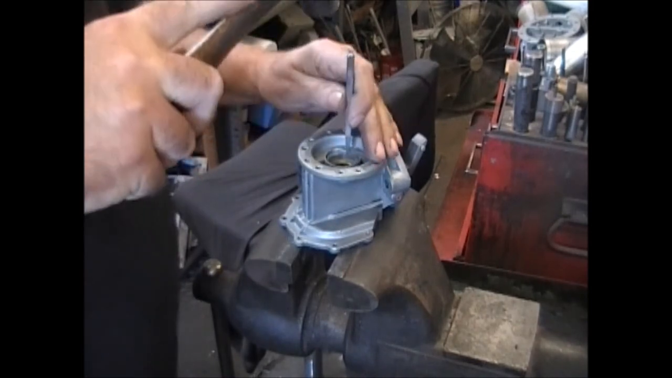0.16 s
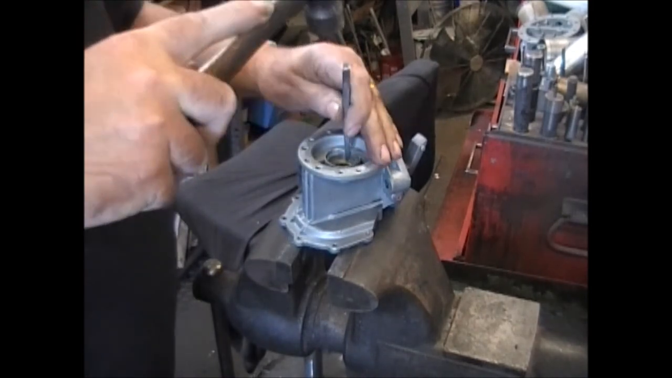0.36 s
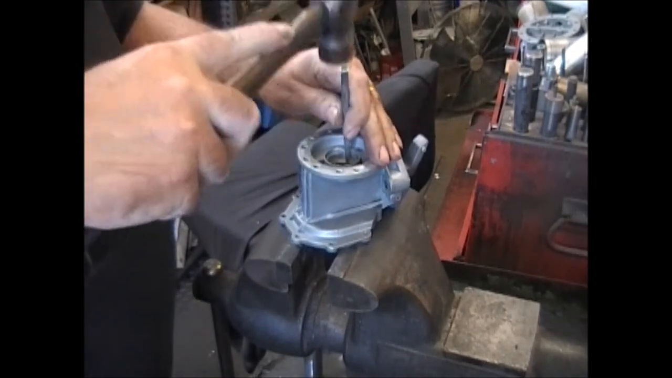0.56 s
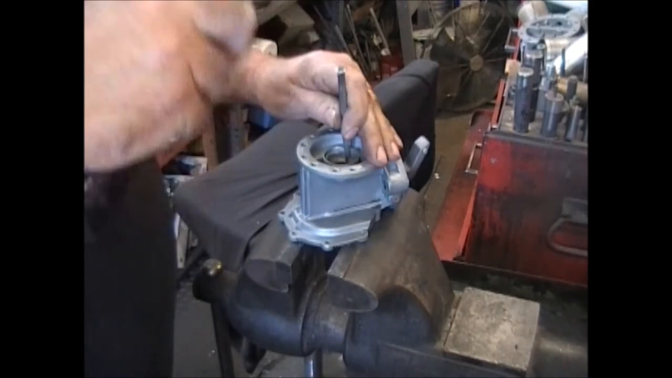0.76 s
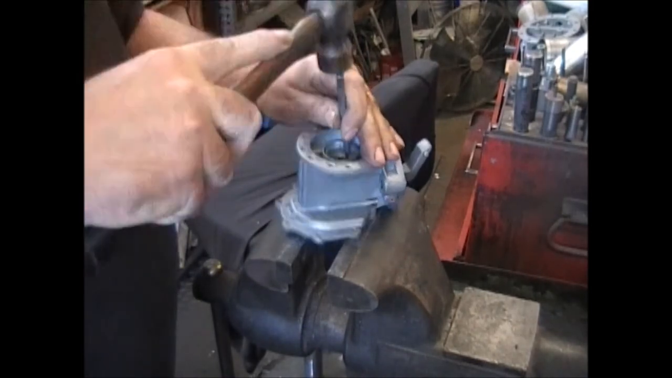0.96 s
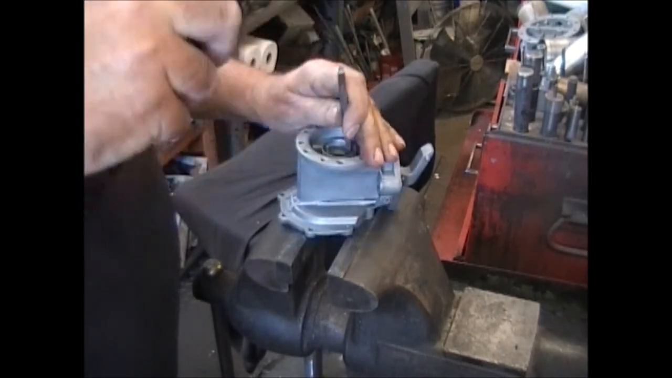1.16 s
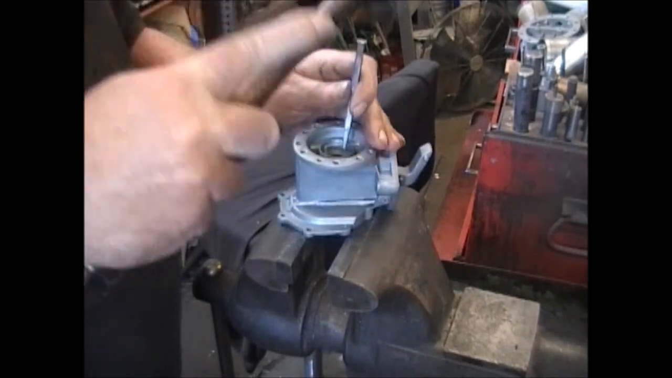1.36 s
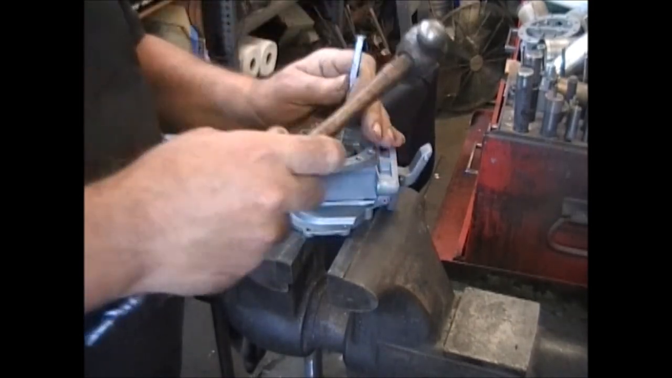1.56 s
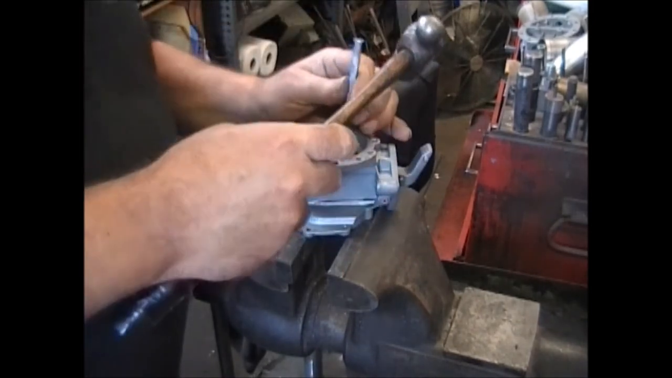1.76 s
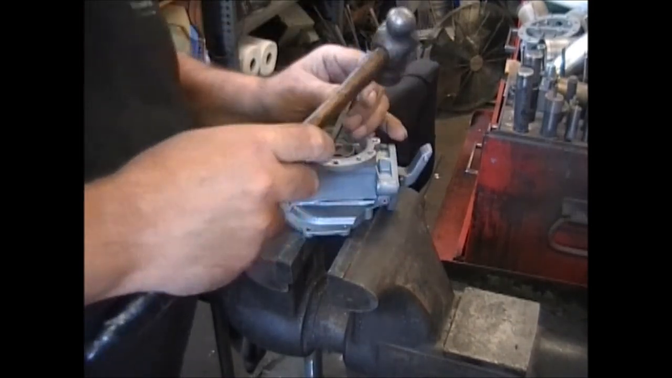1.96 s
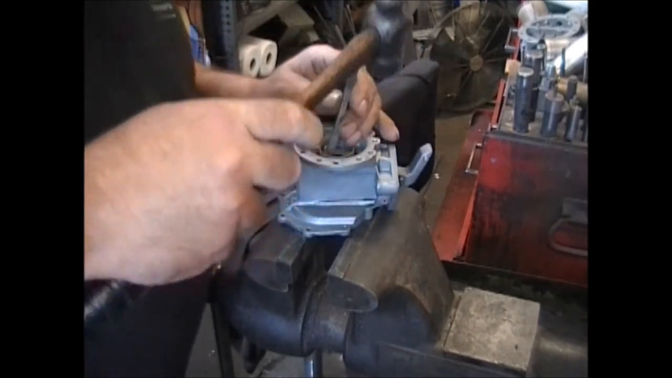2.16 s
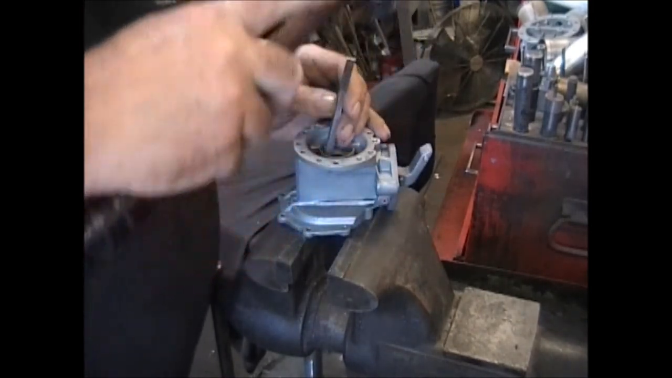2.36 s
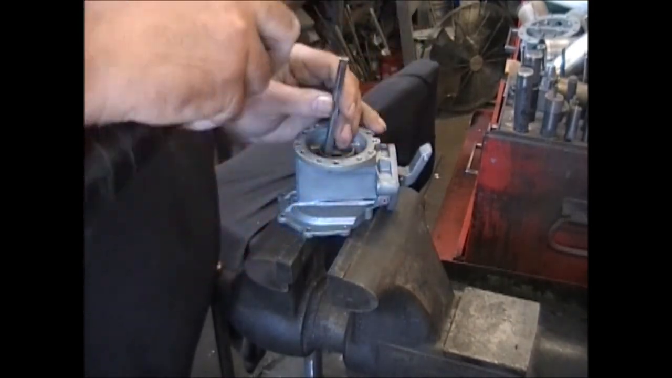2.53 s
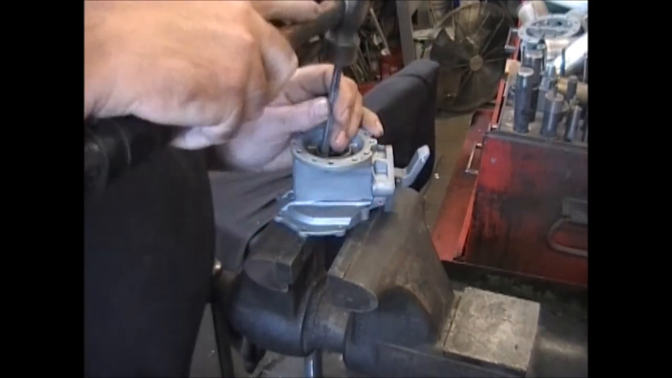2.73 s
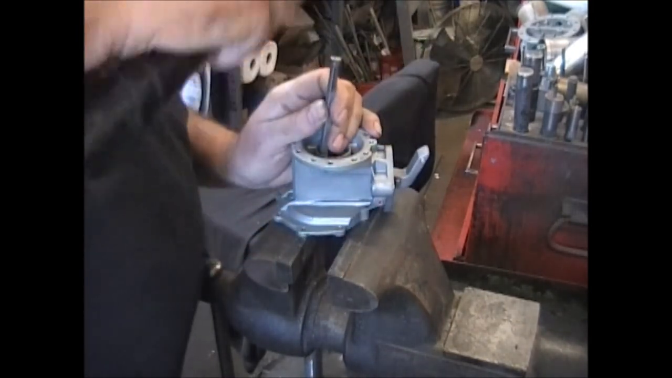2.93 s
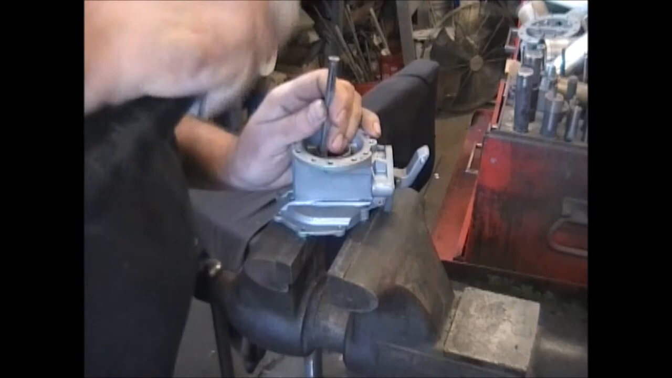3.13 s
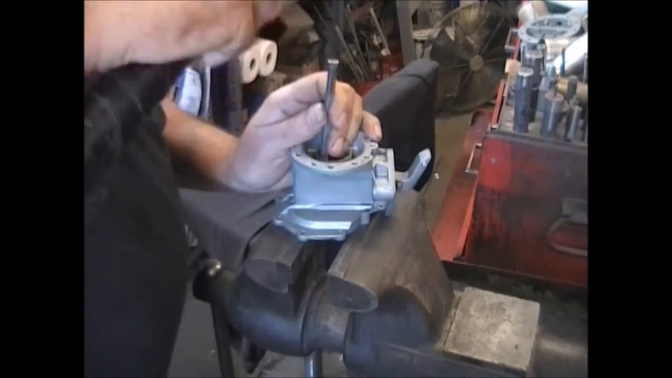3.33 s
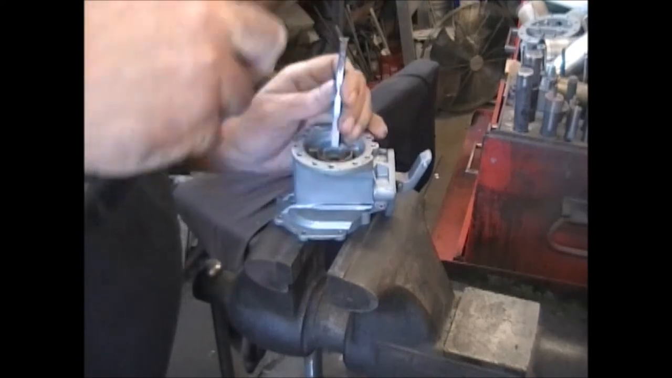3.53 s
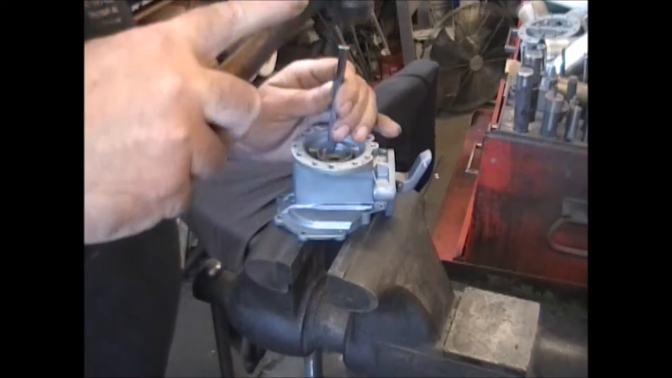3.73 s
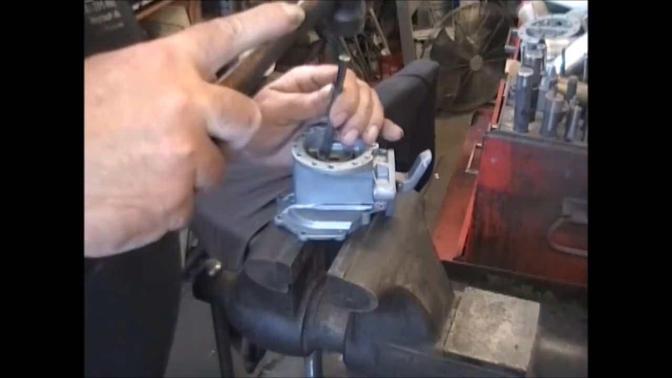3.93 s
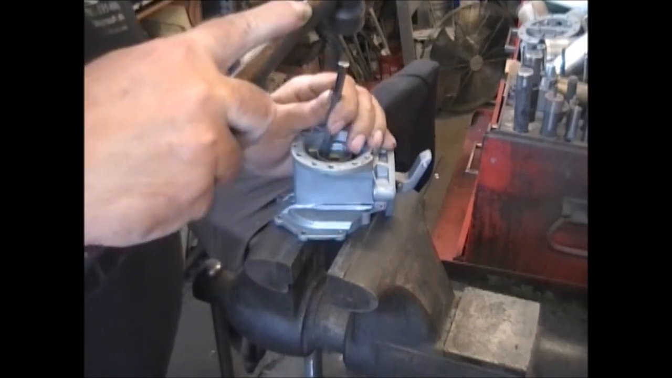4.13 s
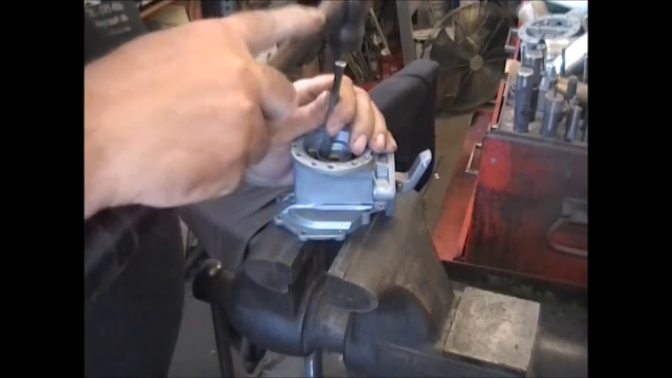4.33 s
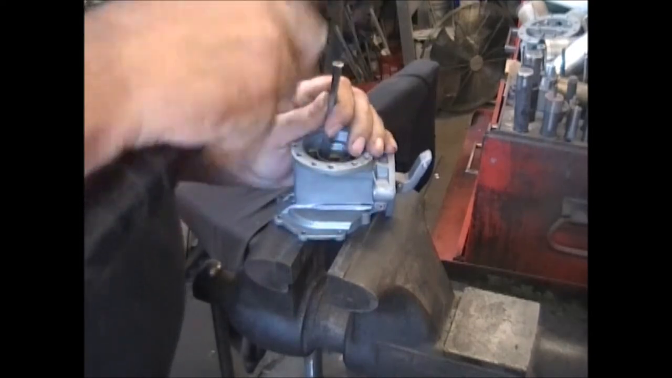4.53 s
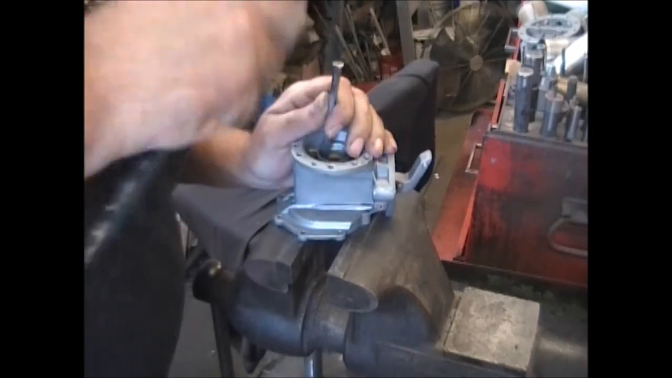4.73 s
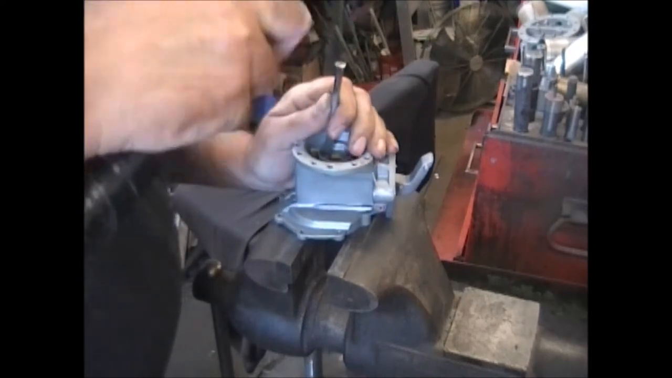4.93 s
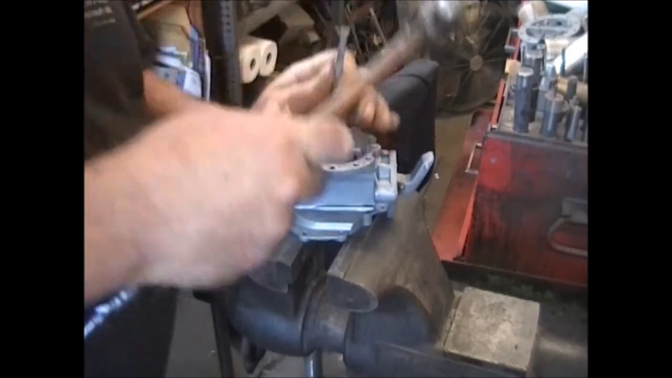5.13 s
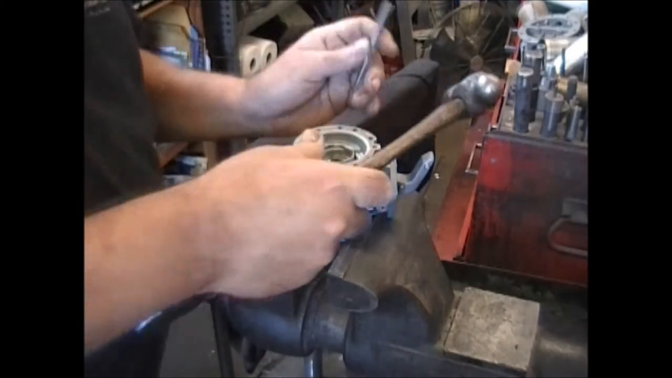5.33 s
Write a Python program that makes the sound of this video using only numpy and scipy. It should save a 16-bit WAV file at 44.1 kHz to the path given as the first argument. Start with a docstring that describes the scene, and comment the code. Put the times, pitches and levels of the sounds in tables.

```python
"""Microphone hiss, buzzing lamps and a faintly humming vise stand, then light clinks of steel.
We are in a cluttered workshop, by the vise, where a hammer drives a steel punch round a cast housing
in three pairs of blows. Each blow cracks, rings punch and housing and sets the stand humming again;
after two of the hardest the punch chatters back. The room answers from behind the direct sound.
The recorder ducks its gain at every blow and lets it creep back; the loudest peaks overload it."""
import sys
import numpy as np
from scipy import signal
from scipy.fft import rfft, irfft, next_fast_len
from scipy.io import wavfile
from scipy.ndimage import uniform_filter1d

SR = 44100
rng = np.random.default_rng(int(sys.argv[2]) if len(sys.argv) > 2 else 0)


def generate_wav(sig):
    """Save sig (samples, or channels by samples) to the path in sys.argv[1] as 16-bit PCM at SR."""
    pcm = np.round(np.clip(np.atleast_2d(sig).T, -1, 1) * 32767).astype(np.int16)
    wavfile.write(sys.argv[1], SR, pcm)


N = 237561
T = np.arange(N) / SR

# Noise floor at the microphone, mid and side spectra: frequency_hz, relative_db
HISS_MID = [(18, -34), (30, -16), (112, -4), (153, -8), (345, -5.5), (449, -6.5), (615, -3.5), (665, -6.5),
            (739, -3), (888, -6.5), (1760, -8.5), (2110, -9), (4410, -12), (8490, -1), (16000, -20)]
HISS_SIDE = [(18, -18), (30, -7), (120, -14), (345, -8.5), (404, -9), (720, -9.5), (1070, -11.5),
             (2000, -17.5), (2820, -19.5), (3390, -23.5), (5880, -24), (9190, -3.5), (14700, -25.5),
             (16000, -29.5)]
# Overtones of the lamps: multiple_of_buzz, rms_db
LAMP_OVERTONES = list(zip([4, 6, 9, 11, 12, 13, 16, 17, 18, 19, 21, 22, 23, 24, 25, 26, 29, 33],
                  [-68, -63.5, -70, -70, -66, -71.5, -61.5, -72, -58.5, -63, -66.5, -67.5, -67.5, -66, -69, -74.5, -70.5, -69]))
# Modes of the vise stand: pitch_hz
STAND_HZ = [337, 451.5, 486.5, 534, 670.5, 3720]
# A row for each of those pitches: t60_s, mean_db, swing_db, lobe_count, loudest_seat_deg
STAND_MODES = [(2.9, -77, 2.5, 3, 100), (1.5, -72, 4, 1, 95), (1.8, -63.5, 3, 3, 110),
               (1.9, -75, 19, 2, 159), (1.5, -66.5, 18, 1, 66), (1.1, -82.5, 23, 1, 56)]
# Modes of punch and housing: pitch_hz
STEEL_HZ = [417, 592, 1070, 1355, 1650, 2175, 2655, 2800, 3100, 3360, 3440, 3900, 4950, 5660, 6620, 6942,
            6995, 7150, 7390, 7550, 7622, 8090, 8317, 8770, 9340, 9960, 10765]
# A row for each, before the hand damps it: t60_s, mean_db, swing_db, lobe_count, loudest_seat_deg
STEEL_MODES = [(0.15, -20.5, 5.5, 1, 208), (0.071, -26, 8, 3, 120), (0.13, -11.5, 3, 2, 90),
               (0.11, -13.5, 14, 1, 125), (0.082, -19.5, 16.5, 1, 115), (0.071, -20, 11, 3, 52),
               (0.31, -20, 9, 3, 65), (0.14, -14, 9, 1, 318), (0.3, -25.5, 6.5, 2, 93),
               (0.23, -16, 5.5, 1, 220), (0.14, -26.5, 11, 3, 16), (0.21, -11, 11.5, 1, 252),
               (0.19, -23, 8, 3, 20), (0.35, -15.5, 6.5, 1, 290), (0.037, -5.5, 15.5, 1, 218),
               (0.07, -16.5, 16, 1, 130), (0.18, -3.5, 8, 2, 25), (0.24, -7.5, 17, 1, 284),
               (0.099, -6, 15.5, 2, 133), (0.2, -14, 12.5, 1, 360), (0.15, -5, 12, 2, 173),
               (0.054, -4.5, 16, 1, 91), (0.05, -9, 13.5, 2, 120), (0.14, -14, 8, 1, 500),
               (0.098, -10, 7, 2, 96), (0.06, -19.5, 11.5, 2, 130), (0.089, -23, 7.5, 3, 28)]
# Stereo width of the steel and its echoes: frequency_hz, side_gain_db
STEEL_WIDTH = [(60, -9.5), (200, -13.5), (500, -19.5), (1200, -15), (2400, -15), (6000, -15.5), (7500, -10),
               (9200, -3.5), (15000, -6.5)]
# Thud, knock, clank, ring and sizzle bands of contact noise: low_hz, high_hz
CONTACT_BANDS = [(250, 800), (900, 2300), (2300, 5000), (5000, 9000), (9000, 14000)]
# Light touches of punch and hammer: start_s, strength_db, body_db, low_hz, low_db, high_hz, high_db
TOUCHES = [(0.2841, -37, 1.7, 1920, -8.5, 6220, -7), (0.4395, -27, -1, 1130, -6.5, 7300, -5),
           (0.4781, -31.5, 9, 577, 2.5, 4750, -6.5), (0.6091, -32.5, -10, 4030, -8, 7580, -1.5),
           (0.7587, -30, -25, 3980, -3.5, 7180, -3.2), (0.9394, -32, -12, 4030, -7, 7020, -7.5),
           (1.3204, -26.5, 10.5, 585, 4.5, 7370, -19), (2.2478, -23.5, -6.5, 1113, -13.5, 6590, -10.5),
           (2.4894, -39, -9.5, 2080, -11.5, 7600, -5.5), (3.8642, -30.5, -12, 680, -13.5, 4930, -7.5),
           (3.8746, -30.5, -0.5, 490, -12, 8960, -1), (4.0577, -37.5, -26, 740, -5.5, 7020, -1),
           (4.134, -41.5, 6.5, 620, 11.5, 8160, -7.5), (5.1362, -35.5, -11.5, 3270, 0, 8360, 8)]
# Decay of the workshop: frequency_hz, t60_s
ROOM_DECAY = [(150, 1), (500, 0.75), (1500, 0.64), (4000, 0.64), (8000, 0.56), (14000, 0.19)]
# Strength of its echoes: frequency_hz, gain_db
ROOM_GAIN = [(150, -17), (500, -10.5), (1500, -14.5), (4000, -12), (8000, -20), (14000, -32)]
# Hammer blows, the seat being the punch's place round the housing: start_s, strength_db, seat_deg,
# thud_db, knock_db, edge_db, ring_db, rattle_db, damping_factor, linger_db, rise_s
BLOWS = [(0.6544, 3.5, 350, -8, -11.5, -6, -21, -13, 3.2, -4.3, 0.00012),
         (0.989, 17.5, 311, -8, -10, 6, -21.5, -20.5, 2.2, 7, 0.0007),
         (2.7186, 8.5, 15, -19, -14.5, -7.5, -16, -14, 3.8, 2.5, 0.00037),
         (3.193, 20, 30.5, -22.5, -8.5, -3.55, -17, -15.5, 2.96, -4, 0.00041),
         (4.4084, 9.5, 106, -16, -8.5, 0.1, -16.5, -18, 2.73, -8, 0.00018),
         (4.804, 20, 158.7, -22, -6.5, 0.25, -15, -17, 2.97, -8.5, 0.00022)]
# Tone of the crack, the loose parts and the shaken bench: frequency_hz, gain_db
CRACK_TONE = [(120, -10.5), (400, -5.5), (1000, -11.5), (1700, 0.25), (4000, -1.37)]
RATTLE_TONE = [(300, 6.5), (1500, 7), (4000, -0.5), (8000, -2.5), (14000, -11.5)]
BENCH_TONE = [(120, -39), (400, -22.5), (900, -18.5), (1600, -17), (2600, -28.5), (6000, -48.5)]
# Bounces of the punch: start_s, strength_db, knock_db, ring_db
REBOUNDS = [(3.2105, 1.5, -14, -13.5), (3.2232, 4, -18, -5), (3.2506, -1.5, -9, -26),
            (4.8256, 3, -17, -7.5), (4.8347, 6.5, -13, -9.5), (4.8503, 2.3, -3.5, -10)]
# Tone of the recorder's overload noise: frequency_hz, gain_db
SPATTER_TONE = [(60, -8), (400, 0), (1500, -3), (4000, -10), (7000, -25)]


def undb(db):
    return 10 ** (np.asarray(db) / 20)


def at(table, hz):
    """Read (frequency_hz, value) rows on a log-frequency axis."""
    frequencies, values = np.transpose(table)
    return np.interp(np.log(np.maximum(hz, 1)), np.log(frequencies), values)


def fade(t, t60):
    return np.exp(-np.log(1000) * t / t60)


def rise(t, rise_s):
    return 1 - np.exp(-t / rise_s)


def colour(x, table):
    """Minimum-phase filter from (frequency_hz, gain_db) rows."""
    size = next_fast_len(x.shape[-1] + 2048)
    cepstrum = irfft(at(table, np.arange(1025) * SR / 2048) * np.log(10) / 20)
    cepstrum[1:1024] *= 2
    cepstrum[1025:] = 0
    impulse = irfft(np.exp(rfft(cepstrum)))
    return irfft(rfft(x, size) * rfft(impulse, size), size)[..., :x.shape[-1]]


def waver(rate_hz):
    """Random steps, smoothed twice into a drift."""
    hold = int(SR / rate_hz)
    steps = np.repeat(rng.standard_normal(N // hold + 1), hold)
    return uniform_filter1d(uniform_filter1d(steps, hold), hold)[:N]


def seated(modes, seat_deg):
    """Decay and level of each mode when the punch sits at this angle."""
    t60, mean_db, swing_db, lobes, loudest_deg = np.transpose(modes)
    return t60, mean_db + swing_db * np.cos(lobes * np.radians(seat_deg - loudest_deg))


def left_right(mid, side):
    return np.array([mid + side, mid - side])


def hiss(mid_db=-45.5, side_db=-46):
    """Room air and the microphone's own noise, mid and side unrelated."""
    mid = colour(rng.standard_normal(N), HISS_MID)
    side = colour(rng.standard_normal(N), HISS_SIDE)
    floor = left_right(undb(mid_db) * mid / mid.std(), undb(side_db) * side / side.std())
    return undb(.5 * waver(24)) * floor


def lamp_buzz(buzz_hz=120):
    """Lamps buzz at twice the mains rate; each overtone wavers and meets left and right with a lag."""
    out = 0
    for multiple, db in LAMP_OVERTONES:
        amplitude = np.sqrt(2) * undb(db + 1.1 * waver(7.6))
        phase = 2 * np.pi * (multiple * buzz_hz * T + rng.random())
        lag = .08 * rng.standard_normal() * np.array([[1], [-1]])
        out = out + amplitude * np.sin(phase + lag)
    return out


def stand_hum(boost_db=11, swell_s=.24, stop_s=.05):
    """The heavy stand swells into a few pure tones after each blow; the next blow stops them."""
    earlier_blow = (-0.46, 17, 300)  # still humming as we come in: start_s, strength_db, seat_deg
    strikes = [earlier_blow] + [row[:3] for row in BLOWS]
    ends = [row[0] for row in BLOWS] + [T[-1]]
    out = 0
    for (start_s, db, seat_deg), end_s in zip(strikes, ends):
        t60, mode_db = seated(STAND_MODES, seat_deg)
        t = np.maximum(T - start_s, 0)
        envelope = rise(t, swell_s) ** 2 * np.exp(-np.maximum(T - end_s, 0) / stop_s)
        tones = np.sin(2 * np.pi * (np.outer(STAND_HZ, t) + rng.random((len(t60), 1))))
        out = out + envelope * (undb(db + boost_db + mode_db) @ (tones * fade(t, t60[:, None])))
    return np.sqrt(2) * out


def contact_noise(band_db, envelope):
    """Noise of steel meeting steel, mid and side, with a level for each contact band."""
    spectrum = [(50, band_db[0] - 36.5), (170, band_db[0] - 6.5)]
    for (low, high), db in zip(CONTACT_BANDS, band_db):
        spectrum.append((np.sqrt(low * high), db - 10 * np.log10((high - low) / 4000)))
    spectrum.append((17000, band_db[-1] - 31))
    return colour(rng.standard_normal((2, len(envelope))) * envelope, spectrum)


def ring(t, hz, db, t60, linger_db=0):
    """Struck modes die away, mid and side; a faint part that the hand does not damp lingers."""
    chance = rng.standard_normal((len(hz), 4))
    detuned_hz = hz * (1 + 0.002 * chance[:, 0])
    amplitude = undb(db + 0.26 * chance[:, 1])
    phases = np.exp(2j * chance[:, 2:].T)
    tones = np.exp(2j * np.pi * detuned_hz[:, None] * t)
    # the housing outlasts the gripped punch
    tail_db = np.interp(hz, [500, 2500, 6000, 6800, 8500, 9300], [-23, -21, -21.5, -37, -37.5, -25.5])
    t60 = np.reshape(t60, (-1, 1))
    decay = fade(t, t60) + undb(linger_db + tail_db)[:, None] * fade(t, 2.8 * t60)
    return np.imag(phases @ (tones * decay * amplitude[:, None]))


def touch(t, body_db, low_hz, low_db, high_hz, high_db):
    """A light touch of the tools: a two-note clink, a short scrape and a faint ring."""
    clink = ring(t, [low_hz, high_hz], [low_db, high_db], t60=.055)
    band_db = [body_db, body_db, -5, 0, -11.5]
    # the steel's modes speak by chance, as far as their band is struck
    mode_db = np.interp(STEEL_HZ, np.mean(CONTACT_BANDS, axis=1), band_db) - 12.5
    mode_db += 3 * rng.standard_normal(len(STEEL_HZ))
    scrape = contact_noise(band_db, fade(t, t60=0.045))
    steel = ring(t, STEEL_HZ, mode_db, t60=0.25 * np.transpose(STEEL_MODES)[0])
    return (scrape + clink + steel) * rise(t, rise_s=0.0022)


def workshop_echoes(direct):
    """The room's answer at the microphone: half-octave bands, each dying at its own rate."""
    t = T[:SR]
    tail = 0
    for hz in 60 * 2 ** np.arange(0, 8.1, .5):
        band = signal.butter(2, [hz / 2 ** .25, hz * 2 ** .25], "band", fs=SR, output="sos")
        noise = signal.sosfilt(band, rng.standard_normal((2, len(t))))
        tail = tail + undb(at(ROOM_GAIN, hz)) * noise * fade(t, at(ROOM_DECAY, hz))
    tail = tail * rise(t, rise_s=0.0096) / np.sqrt(SR / 20)
    mid, side = signal.fftconvolve(direct.mean(axis=0)[None], tail, axes=1)[:, :N]
    return left_right(mid, colour(side, STEEL_WIDTH))


def impact(t, mode_db, t60, band_db, rattle_db, crack_t60, rattle_t60, linger_db=0):
    """A crack, then a grainy rattle of loose parts that keeps knocking the steel's modes."""
    grains = undb(3.7 * np.repeat(rng.standard_normal(len(t) // 90 + 1), 90)[:len(t)])
    shaking = uniform_filter1d(grains, size=40) * fade(t, rattle_t60)
    crack = colour(contact_noise(band_db, fade(t, crack_t60)), CRACK_TONE)
    rattle = undb(rattle_db) * colour(contact_noise(band_db, shaking), RATTLE_TONE)
    knocks = undb(rattle_db - 12.5) * shaking * rng.standard_normal(len(t))
    knocks[0] = 1  # the strike itself
    steel = signal.fftconvolve(ring(t, STEEL_HZ, mode_db, t60, linger_db), knocks[None], axes=1)
    # vise and bench take up the blow a moment later and shake on
    bench = colour(contact_noise(band_db, rise(t, 0.0015) * fade(t, 0.53)), BENCH_TONE)
    return crack + rattle + bench + steel[:, :len(t)]


def blow(t, seat_deg, thud_db, knock_db, edge_db, ring_db, rattle_db, damping, linger_db, rise_s):
    """The hammer lands on the punch; its seat on the housing decides which modes ring loudest."""
    t60, mode_db = seated(STEEL_MODES, seat_deg)
    band_db = [thud_db, knock_db, edge_db - 8, 0, edge_db + 2.36]
    hit = impact(t, mode_db + ring_db, t60 / damping, band_db, rattle_db,
                 crack_t60=0.017, rattle_t60=0.15, linger_db=linger_db)
    return hit * rise(t, rise_s)


def rebound(t, start_s, knock_db, ring_db, damping=7.5):
    """The punch chatters back on the seat of the last blow, heavily damped."""
    seat_deg = [row[2] for row in BLOWS if row[0] < start_s][-1]
    t60, mode_db = seated(STEEL_MODES, seat_deg)
    hit = impact(t, mode_db + ring_db, t60 / damping, band_db=[-10, knock_db, -6, 0, -32],
                 rattle_db=-5, crack_t60=0.015, rattle_t60=0.089)
    return hit * rise(t, rise_s=0.00048)


def hammering():
    """The direct sound from the vise, left and right: blows, rebounds and touches."""
    t = T[:SR // 2]
    events = [(start_s, db, blow(t, *rest)) for start_s, db, *rest in BLOWS]
    events += [(start_s, db, rebound(t, start_s, *rest)) for start_s, db, *rest in REBOUNDS]
    events += [(start_s, db, touch(t, *rest)) for start_s, db, *rest in TOUCHES]
    out = np.zeros((2, N + SR))
    for start_s, db, (mid, side) in events:
        first = int(start_s * SR)
        out[:, first:first + len(t)] += undb(db) * left_right(mid, colour(side, STEEL_WIDTH))
    return out[:, :N]


def scene():
    """The workshop as it reaches the stereo microphone."""
    steel = hammering()
    return steel + workshop_echoes(steel) + lamp_buzz() + stand_hum() + hiss()


def auto_gain_db(x, start_db=-15, threshold_db=-15, peak_decay_s=0.12):
    """The recorder ducks on peaks over the threshold, then recovers in a slow and a quick stage."""
    share, attack_s, recover_s = np.array([.5, .2]), np.array([.013, .03]), np.array([1.1, .25])
    block = 44
    block_s = block / SR
    peaks = np.abs(x[:, :N // block * block]).max(axis=0).reshape(-1, block).max(axis=1)
    stage_db = start_db * share / share.sum()
    held, gains_db = 0., []
    for peak in peaks:
        held = max(peak, held * np.exp(-block_s / peak_decay_s))
        aim_db = share * min(0, threshold_db - 20 * np.log10(held + 1e-9))
        stage_db += (aim_db - stage_db) * block_s / np.where(aim_db < stage_db, attack_s, recover_s)
        gains_db.append(stage_db.sum())
    return np.interp(np.arange(N), block * np.arange(1, len(gains_db) + 1), gains_db)


def overload(x, clip_at=.93, spatter_from=.95, spatter_s=.008):
    """The hardest blows clip and spatter noise, opposite in left and right."""
    excess = np.maximum(np.abs(x).max(axis=0) - spatter_from, 0)
    pole = np.exp(-1 / (spatter_s * SR))
    envelope = signal.lfilter([1 - pole], [1, -pole], excess)
    spatter = undb(10) * envelope * colour(rng.standard_normal(N), SPATTER_TONE)
    return np.clip(x, -clip_at, clip_at) + spatter * np.array([[1], [-1]])


def record(dry):
    """The recorder's chain: automatic gain, overload, bass cut and a steep top cut."""
    bass_cut_hz, top_cut_hz = 110, 15900
    x = overload(dry * undb(auto_gain_db(dry)))
    x = signal.sosfilt(signal.butter(2, bass_cut_hz, "high", fs=SR, output="sos"), x)
    return signal.sosfilt(signal.ellip(8, .2, 70, top_cut_hz, fs=SR, output="sos"), x)


dry = scene()
out = record(dry)
generate_wav(out)
```